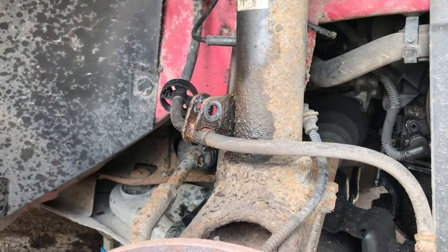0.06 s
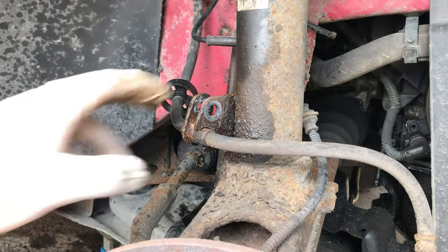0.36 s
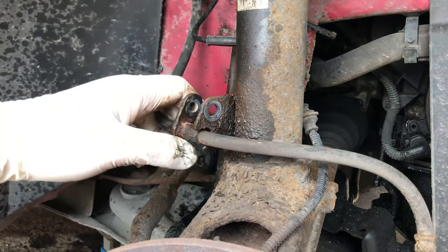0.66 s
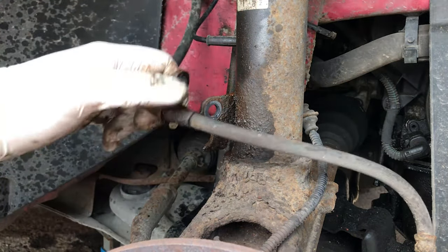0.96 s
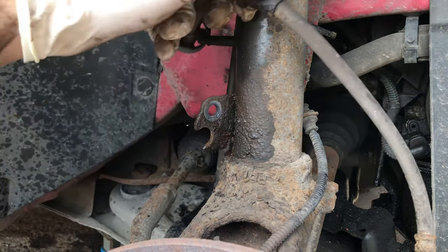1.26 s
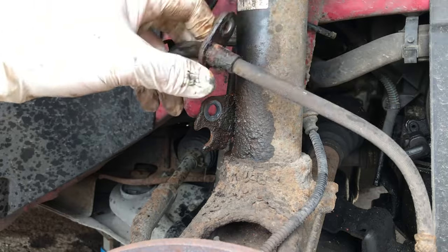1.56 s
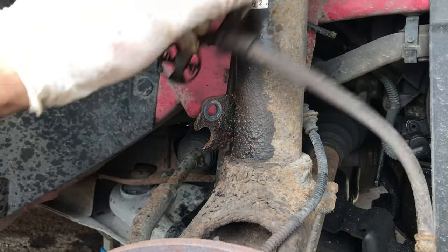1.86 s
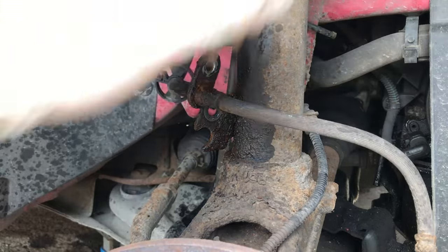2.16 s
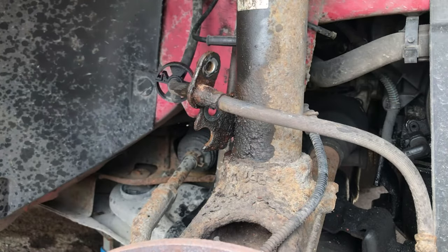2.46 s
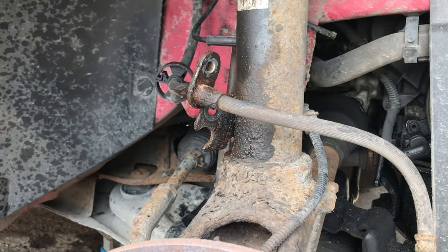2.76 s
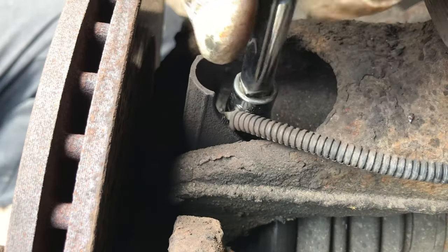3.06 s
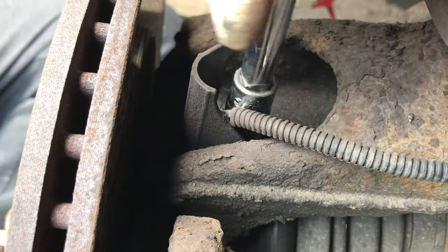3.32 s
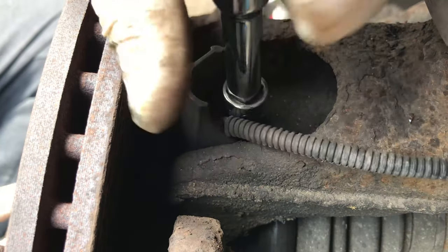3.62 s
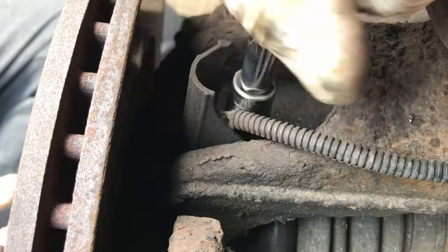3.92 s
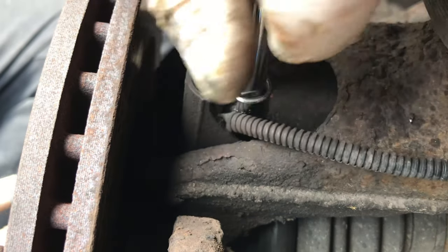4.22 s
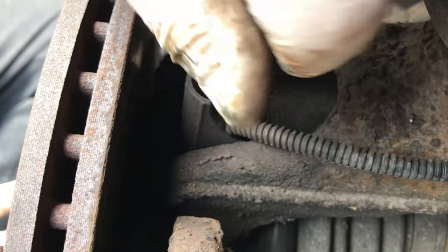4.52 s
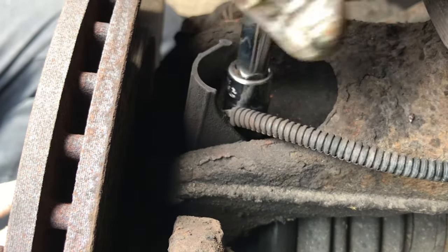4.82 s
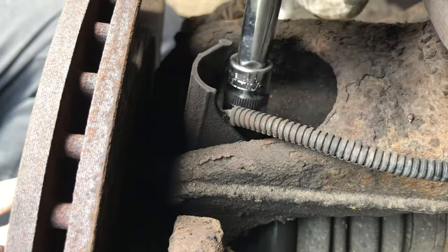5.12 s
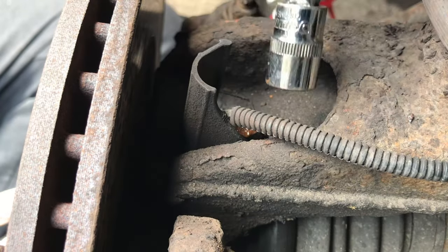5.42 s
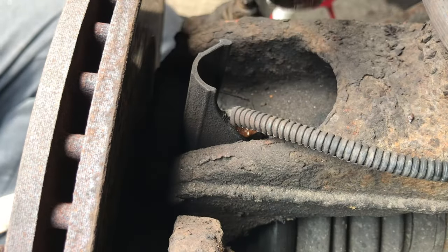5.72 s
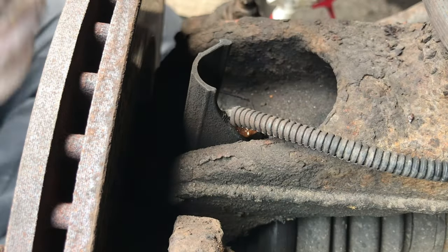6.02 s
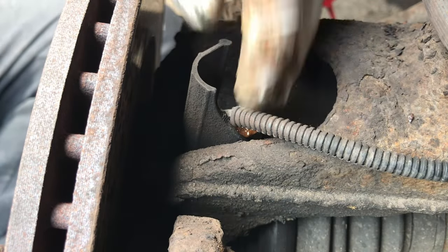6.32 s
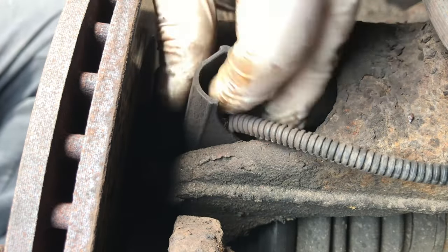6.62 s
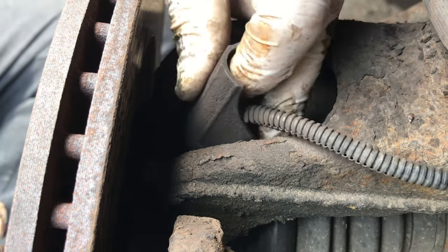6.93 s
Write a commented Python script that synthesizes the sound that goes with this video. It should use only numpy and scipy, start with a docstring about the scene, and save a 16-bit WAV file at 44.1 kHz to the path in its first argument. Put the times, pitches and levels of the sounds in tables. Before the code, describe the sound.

A few metal knocks, then five quick runs of ratchet clicks, a rattling loose socket and light plastic ticks over soft glove rubbing.

```python
"""Gloves rustle inside a car's wheel arch, close to the microphone, and keep on throughout.
A rusty brake-hose bracket scrapes free and knocks against the strut; then a socket ratchet is swung
back five times, its pawl snapping over the teeth and ringing the tool. The loose socket rattles on
the bolt and is lifted off, and fingers pick at a ribbed cable sleeve. Behind it all, a quiet garage hums."""
import sys
import numpy as np
from scipy import signal
from scipy.fft import rfft, irfft
from scipy.io import wavfile
from scipy.ndimage import uniform_filter1d

SR = 44100
rng = np.random.default_rng(int(sys.argv[2]) if len(sys.argv) > 2 else 0)


def wrap_up_sound(samples):
    """Save the sound to the file named by the first command line argument, as 16-bit audio."""
    columns = np.atleast_2d(samples).T
    # keep every value between -1 and 1, then stretch to whole-number steps
    tamed = np.clip(columns, -1, 1)
    steps = np.round(tamed * 32767).astype(np.int16)
    wavfile.write(sys.argv[1], SR, steps)


N = 307818
TIME = np.arange(N) / SR
AGE = TIME[:12288]  # seconds since a hit
TOP_HZ = 16000


# Back-swings of the handle. Each row: first and last click in seconds, teeth, level in dB,
# slow start as a share of the length, handle ring in dB, t60 of the snap in seconds.
SWINGS = [(3.116, 3.1856, 4, -23.5, .096, 2, 0.033), (3.7084, 3.7704, 5, -19, .1, 0, 0.033),
          (4.1385, 4.237, 8, -18, -0.041, -1.5, .033), (4.527, 4.6116, 8, -18.5, -.061, -2.5, 0.02),
          (4.8888, 4.975, 8, -18.5, -0.022, -2.5, 0.027)]
# Single teeth as the hand starts or stops. Each row: start in seconds, level in dB,
# handle ring in dB, t60 of the snap in seconds.
SINGLE_TEETH = [(3.0334, -22, -10, 0.0091), (3.083, -27, -11, 0.0053), (3.226, -20.5, -14, 0.024),
                (3.668, -16, -2, 0.054), (3.6841, -24, -3, 0.014), (3.7938, -19.5, -13, 0.031)]

def pawl_drops(tire_db=3.5, skim_db=2, ring_scatter_db=2.8):
    """Each drop's time, level, handle ring, head ring and t60; the pawl falls less far in mid-swing."""
    for start, end, count, db, slow_start, ring_db, t60 in SWINGS:
        times = tooth_times(start, end, count, slow_start)
        turned = np.linspace(0, 1, len(times))
        middle = np.sin(np.pi * turned)
        force, grip, seat = rng.standard_normal((len(times), 3)).T
        levels = db - tire_db * turned - skim_db * middle + force
        handle_db = ring_db - 0.79 + 5 * middle - 6.4 * turned + ring_scatter_db * grip
        head_db = -12 + 1.4 * middle - 2.8 * turned + ring_scatter_db * seat
        yield from zip(times, levels, handle_db, head_db, np.full(len(times), t60))
    for s, db, ring_db, t60 in SINGLE_TEETH:
        yield s, db, ring_db, -22, t60


def tooth_times(start, end, count, slow_start, easing=0.026):
    """A swing eases in and out, so its clicks crowd in the middle."""
    turned = np.linspace(0, 1, round(count))
    eased = turned + slow_start * np.sin(np.pi * turned) + easing * np.sin(2 * np.pi * turned)
    return start + (end - start) * eased


# Short resonances of the whole tool. Each row: frequency in Hz, width in Hz, gain in dB.
TOOL_RESONANCES = [(654, 68, -10), (1150, 180, -10), (1695, 113, -3.5), (1890, 130, -5), (2340, 77, 1),
                   (3040, 200, -4), (3170, 310, -2), (3930, 460, 4), (4410, 200, 7), (4680, 220, 1.5),
                   (5350, 260, 0.5), (6220, 630, 1), (6500, 160, 6), (6800, 300, 4), (7600, 190, 5.5),
                   (8200, 150, 5.5), (9220, 200, 2.5), (9900, 340, -0.5), (10000, 200, -0.5),
                   (11130, 730, -5), (11900, 320, 5), (13155, 370, 6.5), (12930, 520, 3), (13600, 410, 4.5),
                   (15450, 350, -5.5)]
# Longer modes of its handle and head. Each row: frequency in Hz, gain in dB, t60 in seconds.
HANDLE_MODES = [(4160, -8.5, 0.041), (4085, 3, 0.053), (4620, -15.5, 0.053)]
HEAD_MODES = [(7200, -7, .05), (8090, 10, 0.039), (9000, -9, 0.061), (12000, -2, .05), (14300, -8.5, 0.043)]
# Steel cracking on steel, heard close up. Each row: frequency in Hz, gain in dB.
CRACK_SPECTRUM = [(200, -38), (1400, -16), (3500, 0.5), (7000, -0.5), (10500, 4.5), (13000, 1), (16000, 1)]

def ratchet(snap_db=-1, crack_db=-5, bounce_db=-8, slide_db=-19, tail_db=-30):
    """Close to the microphone, the pawl slides up a tooth, drops and bounces, ringing the tool."""
    out = np.zeros(N)
    treble = np.clip(np.log2(bins(len(AGE)) / 7000), 0, 1)
    build_up = 1 - fade(0.011)  # the tool takes up the blow over a few round trips
    for s, db, handle_db, head_db, t60 in pawl_drops():
        contact = fade(0.019)
        bounce = undb(bounce_db) * np.roll(contact, int(rng.uniform(0.00041, 0.0038) * SR))
        crack = unit_attack(colour(hiss(), CRACK_SPECTRUM) * (contact + bounce))
        decay = fade(t60) + undb(tail_db) * fade(0.2)
        chatter = unit_attack(resonate(hiss() * decay, TOOL_RESONANCES))
        snap = undb(snap_db) * chatter + undb(crack_db) * crack
        add(out, s, undb(db) * shade(snap, treble * rng.normal(-0.9, 2.2)))
        handle = undb(handle_db) * ring(HANDLE_MODES, detune=0.0034)
        head = undb(head_db) * ring(HEAD_MODES, detune=0.002)
        add(out, s, undb(db) * build_up * (handle + head))
        slide = colour(hiss(), CRACK_SPECTRUM) * fade(0.009)[::-1]  # swells up to the drop
        add(out, s - AGE[-1], undb(db + slide_db) * slide)
    return out


def pawl_catches(share=0.55, longest_lead_s=0.006, catch_db=-12):
    """The pawl often ticks on the tip of a tooth just before it drops."""
    out = np.zeros(N)
    for start, end, count, db, slow_start, _, _ in SWINGS:
        for s in tooth_times(start, end, count, slow_start)[1:]:
            lead = longest_lead_s * rng.uniform(0.3, 1)
            caught = rng.random() < share
            tick = unit_attack(resonate(hiss() * fade(0.012), TOOL_RESONANCES))
            add(out, s - lead, caught * undb(db + catch_db) * tick)
    return out


# Socket and extension tap the steel. Each row: start in seconds, then level, body and brightness in dB.
SOCKET_TAPS = [(1.263, -44.5, -19, 3.5), (1.3135, -52.5, -17, 15), (3.0775, -41.5, -25, 6),
               (3.41, -41, -4, -5), (3.621, -37, -19, -2), (3.6601, -34.5, -13, -7.5),
               (3.8255, -32, -15, -16), (3.8812, -39.5, -13.5, -3.5), (4.0981, -31, -9, -5),
               (4.1368, -30, -22, -11), (4.3041, -34.5, -11, -2), (4.3118, -34.5, -13, -10),
               (4.4716, -53, 5, -21.5), (4.6762, -32.5, -9, -3), (4.7094, -40.5, -12.5, -12),
               (4.7635, -44, 2, -13), (4.8339, -33, -9, -18.5), (5.0174, -32, -12.5, -12),
               (5.0356, -43, 5.5, 10), (5.0929, -33, -1.5, 0.5), (5.1552, -39, -2.5, -3),
               (5.2615, -42, -7, 2), (5.2728, -43.5, -14.5, 4)]
# The socket scrapes on the bolt head. Each row: start and end in seconds, level in dB.
SOCKET_SCRAPES = [(3.596, 3.619, -43), (4.078, 4.099, -50.5), (4.499, 4.527, -44.5), (4.653, 4.696, -44),
                  (4.815, 4.838, -48), (5.003, 5.045, -47), (5.09, 5.098, -38.5), (5.159, 5.185, -52),
                  (5.216, 5.283, -47.5)]
# Socket and hub when tapped, and the hollow bore when scraped.
# Each row: frequency in Hz, width in Hz, gain in dB.
SOCKET_RESONANCES = [(646, 37, 0), (960, 62, -1.5), (1726, 131, 4), (1890, 150, 1.5), (2390, 330, -1.5),
                     (3060, 110, 3.5), (3510, 84, 7), (3960, 120, 7), (4530, 130, 4), (5680, 820, -3.5),
                     (6850, 610, 2), (7700, 520, 0.5), (8840, 1500, -2), (12100, 460, -3.5),
                     (13530, 1300, -9.5)]
BORE_RESONANCES = [(655, 85, -10.5), (1700, 240, 7.5), (1790, 110, -4), (2930, 200, -8), (3680, 260, -3),
                   (7000, 900, -18.5)]

def socket(rattles_per_s=60):
    """At the hub, the loose socket rattles and scrapes between swings and as it is lifted off."""
    slips = resonate(grains(per_s=4500, spread_db=4.5), BORE_RESONANCES)
    touches = list(SOCKET_TAPS)
    for start, end, db in SOCKET_SCRAPES:  # light, dull taps at uneven moments of each scrape
        count = max(round((end - start) * rattles_per_s), 1)
        times = start + (end - start) * (np.arange(count) + rng.random(count)) / count
        touches += [(s, db + rng.normal(1, 1.5), -7.5, -13.5) for s in times]
    ticks = taps(touches, SOCKET_RESONANCES, gain_db=3.5, crack_db=-9.5, contact_t60=0.013,
                 body_db=8, bright_db=1, tail_db=-21.5, tail_t60=0.061)
    return ticks + swells(slips, SOCKET_SCRAPES, taper=0.37)


# Blows on the strut. Each row: start in seconds, level in dB, centre of the clank in Hz,
# its width in octaves, body thump in dB.
STRUT_BLOWS = [(1.268, -23.5, 2780, 0.56, -25), (1.295, -44, 2120, 2.4, -4), (1.366, -53, 1390, 1.1, -20),
               (1.6982, -26.5, 2260, 0.75, -22), (1.9312, -26, 1090, 3.7, -5),
               (1.934, -31.5, 3880, 0.12, -11.5), (2.297, -41.5, 5360, 0.65, -1.5),
               (2.7325, -34, 1850, 0.7, -13), (2.756, -47, 1500, 0.98, -35), (3.799, -35.5, 900, 6.8, 3),
               (5.47, -60, 4500, 1.03, -21.5), (5.824, -53.5, 2000, 1.8, -18)]
# Modes of strut and hose, and the low ones of suspension and wing.
# Each row: frequency in Hz, gain in dB, t60 in seconds.
STRUT_MODES = [(476, -11.5, 0.23), (690, -2.5, 0.12), (950, -5, 0.1), (1140, 0.5, 0.093), (1400, -5, 0.059),
               (1760, -7.5, 0.1), (1920, 2, 0.035), (2100, -18, 0.022), (2290, -7.5, 0.11),
               (2720, -4.5, 0.066), (3237, 8.5, 0.025), (3310, -8, .05), (3430, 0, 0.058),
               (3680, -28, 0.063), (4230, 8.5, 0.023)]
BODY_MODES = [(56, -25, .5), (103.6, -11, 0.51), (181, -9, 0.14), (257.5, -6.5, 0.2), (375, -0.5, 0.049)]
# The strut's clank. Each row: frequency in Hz, gain in dB.
CLANK_SPECTRUM = [(60, -14), (430, 11), (800, -2.5), (960, 9), (1160, 7), (1350, -2.5), (1750, -4.5),
                  (2300, 1.5), (2900, -5.5), (4200, -3.5), (5000, -6), (7500, -6.5), (10000, -10),
                  (16000, -10.5)]

def strut_knocks(clank_db=1, ring_db=-7, skirt_db=22):
    """The place of contact picks which strut modes sound; heavy blows also shake the car's body."""
    out = np.zeros(N)
    for s, db, centre, octaves, thump_db in STRUT_BLOWS:
        def band_db(hz):
            return -skirt_db * np.log10(1 + (np.log2(hz / centre) / octaves) ** 2)
        clank = colour(hiss(), CLANK_SPECTRUM, band_db(bins(len(AGE)))) * fade(0.054)
        metal = ring([(hz, gain + band_db(hz), t60) for hz, gain, t60 in STRUT_MODES], detune=0.0013)
        body = ring(BODY_MODES, detune=0.04) * (1 - fade(0.043))
        onset = 1 - fade(0.0025)  # rust and rubber soften the contact
        knock = undb(clank_db) * clank + undb(ring_db) * metal + undb(thump_db) * body
        add(out, s, undb(db) * onset * knock)
    return out


# The bracket drags on its seat. Each row: start, swell and hold in seconds, force in dB.
BRACKET_DRAGS = [(.6, 0.054, 0.0055, -38), (0.7966, 0.00043, 0.012, -27.5)]
# Its modes. Each row: frequency in Hz, gain in dB, t60 in seconds.
BRACKET_MODES = [(686, -15, 0.055), (1086, -12.5, 0.079), (1686, -5, 0.064), (1798, 2, 0.069),
                 (1853, 3, 0.045), (3510, -23, 0.025), (3780, -1.5, 0.027), (4130, -3.5, 0.034),
                 (5770, -1, 0.0054), (6400, -11, 0.014), (6800, -5.5, 0.033), (7760, -15, 0.0097),
                 (9600, -9, 0.019)]
# Rust grinding under it. Each row: frequency in Hz, gain in dB.
RUST_SPECTRUM = [(200, -14), (650, -14.5), (1050, -6), (1400, -9), (1800, -10), (2500, -21), (3800, 5),
                 (4900, -25), (7500, -10.5), (10000, -17.5), (12000, -22), (16000, -30)]

def bracket(ring_db=-2, rust_db=-4, jolt_db=5, swell_db=13, release_db_per_s=707):
    """Rusty steel sticks, slips and rings; each drag jolts loose, builds, holds and lets go."""
    slips = grains(per_s=11000, spread_db=0.5)
    force = np.zeros(N)
    for start, swell, hold, db in BRACKET_DRAGS:
        age = np.maximum(TIME - start, 0)
        jolt = jolt_db * np.exp(-age / 0.002)
        building = swell_db * np.clip(1 - age / swell, 0, 1)
        release = release_db_per_s * np.maximum(age - swell - hold, 0)
        force += (age > 0) * undb(db + jolt - building - release)
    rings = excite(slips * force, ring(BRACKET_MODES, detune=0.0022))
    return undb(ring_db) * rings + undb(rust_db) * force * colour(slips, RUST_SPECTRUM)


# Fingertips flick the sleeve. Each row: start in seconds, then level, body and brightness in dB.
SLEEVE_FLICKS = [(6.1635, -47, -18, 15), (6.1812, -40, -15, -24.5), (6.3385, -56, 10, -2.5),
                 (6.3634, -57.5, -8, 26.5), (6.3719, -33.5, -4, -29), (6.412, -42, -2.5, -11),
                 (6.5082, -28.5, -12.5, -23), (6.5461, -41, -10, 3.5), (6.5835, -41, -1.5, 7),
                 (6.6122, -47.5, 4.5, -12), (6.7605, -49, -23, 6.5), (6.8972, -44, -3.5, 2.5),
                 (6.9761, -33.5, -11, 0.5)]
# Fingers squeeze it. Each row: start and end in seconds, level in dB.
SLEEVE_SQUEEZES = [(6.29, 6.36, -65), (6.446, 6.47, -51), (6.487, 6.72, -62), (6.7, 6.983, -55.5)]
# The sleeve and its recess in the arch. Each row: frequency in Hz, width in Hz, gain in dB.
SLEEVE_RESONANCES = [(854, 76, -0.5), (1030, 170, -1.5), (1247, 57, 3.5), (1616, 95, 10), (2554, 127, 9.5),
                     (3420, 670, -2.5), (4120, 82, 7), (4530, 120, 5), (5570, 340, 6), (6530, 220, 5),
                     (7300, 310, 6), (9300, 1000, 2.5), (11300, 540, 2), (12900, 2500, -3)]

def sleeve():
    """The cable sleeve's plastic ribs tick when flicked and crackle when squeezed."""
    flicks = taps(SLEEVE_FLICKS, SLEEVE_RESONANCES, gain_db=3.5, crack_db=-9, contact_t60=0.0064,
                  body_db=6, bright_db=-5, tail_db=-7.5, tail_t60=0.039)
    slips = grains(per_s=1400, spread_db=4.5) * undb(10 * wander(45))
    return flicks + swells(resonate(slips, SLEEVE_RESONANCES), SLEEVE_SQUEEZES, taper=0.32)


# Fingers rub on tool and parts. Each row: time in seconds, level in dB.
RUB_LEVELS = [(0.0, -68.5), (0.27, -68.5), (0.68, -64), (0.95, -70), (1.69, -65.5), (1.82, -54.5),
              (2.1, -72.5), (2.62, -66.5), (2.84, -61), (3.03, -63.5), (3.15, -54), (3.58, -62),
              (3.77, -49), (3.95, -57), (4.9, -57.5), (5.12, -50.5), (5.27, -65), (5.5, -72.5), (6.12, -65),
              (6.36, -60), (6.98, -68.5)]
# Gloves brush past, near the microphone.
# Each row: start and end in seconds, level in dB, tilt in dB per octave.
GLOVE_BRUSHES = [(0.041, 0.113, -54, 3.5), (0.436, 0.527, -48.5, 7), (0.589, 0.692, -51.5, -1),
                 (1.352, 1.508, -51.5, 6), (1.606, 1.68, -56.5, 6.5), (1.845, 1.915, -41.5, 2.5),
                 (2.29, 2.374, -45, 3.5), (2.96, 3.01, -51, 5.5), (3.516, 3.67, -55.5, -0.5),
                 (3.979, 4.049, -47.5, 6.5), (4.293, 4.335, -46.5, -3.5), (6.03, 6.212, -49, 2),
                 (6.278, 6.361, -45, 0), (6.457, 6.68, -49.5, 3)]
# The colours of rubbing and of brushing. Each row: frequency in Hz, gain in dB.
FINGER_SPECTRUM = [(120, -45.5), (200, -1.5), (416, -4), (491, -14), (899, -2.5), (1420, -13), (1710, -8),
                   (2130, -13), (3490, -9.5), (12600, -17.5), (16000, -17)]
GLOVE_SPECTRUM = [(180, -44), (300, -23.5), (584, -3), (978, 5.5), (1360, -1), (3130, 0), (5080, -1.5),
                  (6200, 1), (10200, -4), (16000, -4)]

def gloves(rub_db=-1.5, flutter_db=2, treble_flutter_db=5.5, fold_db=2):
    """Rubber and cloth slip finely: steady rubbing whose colour shifts, and brushes that swell and fade."""
    rub = colour(grains(per_s=11000, spread_db=3.5), FINGER_SPECTRUM)
    dull = signal.sosfilt(signal.butter(1, 5000, fs=SR, output="sos"), rub)
    lows = dull * undb(flutter_db * wander(24))
    highs = (rub - dull) * undb(treble_flutter_db * wander(12))
    out = undb(rub_db) * curve(RUB_LEVELS) * (lows + highs)
    crackle = grains(per_s=5000, spread_db=1.6) * undb(flutter_db * wander(70))
    fold_log_hz = np.linspace(np.log(500), np.log(TOP_HZ), 40)
    for start, end, db, tilt in GLOVE_BRUSHES:
        brush = crackle[int(start * SR):int(end * SR)]
        hz = bins(len(brush))
        folds = np.interp(np.log(hz), fold_log_hz, rng.standard_normal(40))  # each fold has its own colour
        octaves = np.log2(np.clip(hz / 4000, 1 / 4, 4))
        brush = colour(brush, GLOVE_SPECTRUM, tilt * octaves + fold_db * folds)
        add(out, start, undb(db) * brush * signal.windows.tukey(len(brush), 0.7))
    return out


def grit(grit_db=-11):
    """Specks of rust and dirt tick under the rubbing fingers."""
    return undb(grit_db) * curve(RUB_LEVELS) * colour(grains(per_s=180, spread_db=2.5), GLOVE_SPECTRUM)


# The car rumbles as it is handled. Each row: time in seconds, level in dB.
RUMBLE_LEVELS = [(0.0, -59.5), (1.22, -65.5), (1.3, -55.5), (1.48, -65.5), (1.9, -56), (1.98, -46.5),
                 (2.04, -57), (2.27, -60.5), (2.33, -57), (2.59, -63.5), (4.18, -56), (4.24, -63.5),
                 (4.35, -55), (4.55, -53), (4.61, -68), (4.7, -51.5), (4.99, -60), (5.07, -50), (5.33, -62),
                 (6.98, -64)]
# That rumble, the garage's air and its hum. Each row: frequency in Hz, level in dB.
RUMBLE_SPECTRUM = [(22, -22.5), (33, -4.5), (48, 9), (80, 2), (108, 3), (171, -4.5), (235, -2.5),
                   (329, -13), (422, -10.5), (650, -33.5), (1100, -85)]
AIR_SPECTRUM = [(59, -23), (100, -2), (124, -20.5), (156, -7.5), (381, -25.5), (502, -21.5), (662, -18),
                (818, -22.5), (1280, -23.5), (3780, -31.5), (16000, -36.5)]
HUM_TONES = [(49.5, -76), (100, -68.5)]
# A faint whistle, far off. Each row: start and end in seconds, first and last pitch in Hz, level in dB.
FAR_WHISTLES = [(2.17, 2.312, 1820, 1790, -69), (2.296, 2.564, 2550, 2070, -69.5),
                (2.866, 2.982, 1840, 2200, -69)]

def garage(rumble_db=0.5, air_db=-67.5):
    """Behind the work: still air, the rumble of the handled car, a low hum and a thin, distant whistle."""
    out = undb(air_db) * colour(rng.standard_normal(N), AIR_SPECTRUM)
    out += undb(rumble_db) * curve(RUMBLE_LEVELS) * colour(rng.standard_normal(N), RUMBLE_SPECTRUM)
    for hz, db in HUM_TONES:
        out += undb(db + 0.86 * wander(3.5)) * np.sqrt(2) * np.sin(2 * np.pi * hz * TIME)
    for start, end, from_hz, to_hz, db in FAR_WHISTLES:
        hz = np.linspace(from_hz, to_hz, int((end - start) * SR))
        add(out, start, undb(db) * np.hanning(len(hz)) * np.sin(2 * np.pi * np.cumsum(hz) / SR))
    return out


def room(x, wet_db=-25, t60=0.23):
    """This close to the work, the workshop's reflections are weak and dull."""
    walls = [(100, -4.5), (1000, 16.5), (3000, 9), (8000, -26), (16000, -32.5)]  # Hz, dB
    tail = colour(hiss(), walls) * fade(t60) * (1 - fade(0.017))
    return x + undb(wet_db) * excite(x, tail)


def taps(rows, resonances, gain_db, crack_db, contact_t60, body_db, bright_db, tail_db, tail_t60):
    """Brief contacts crack and ring a small part; the spot touched shifts the balance of its modes."""
    out, hz = np.zeros(N), bins(len(AGE))
    low = np.clip(np.log2(3500 / hz), 0, 1)
    high = np.clip(np.log2(hz / 5500), 0, 1)
    decay = fade(contact_t60) + undb(tail_db) * fade(tail_t60)
    for s, db, body, bright in rows:
        touched = [(f, width, rng.normal(gain, 1.6)) for f, width, gain in resonances]
        tick = unit_attack(resonate(hiss() * decay, touched))
        tick += undb(crack_db) * unit_attack(colour(hiss(), CRACK_SPECTRUM) * fade(0.006))
        tone_db = low * (body + body_db) + high * (bright + bright_db)
        add(out, s, undb(db + gain_db) * shade(tick, tone_db))
    return out


def swells(sound, rows, taper):
    """Let a steady sound swell and fade in each (start, end, dB) stretch."""
    out = np.zeros(N)
    for start, end, db in rows:
        part = unit(sound[int(start * SR):int(end * SR)])
        add(out, start, undb(db) * part * signal.windows.tukey(len(part), taper))
    return out


def ring(modes, detune):
    """Decaying modes; the grip shifts their pitch a little from blow to blow."""
    out = np.zeros(len(AGE))
    for hz, db, t60 in modes:
        pitch = hz * rng.normal(1, detune)
        out += undb(db) * fade(t60) * np.sin(2 * np.pi * (pitch * AGE + rng.random()))
    return out


def resonate(x, resonances):
    """Pass a sound through (Hz, width, dB) resonances of alternating sign."""
    f = bins(len(x))
    response = sum((-1) ** k * undb(db) / (1 + 1j * (f ** 2 - hz ** 2) / (f * width))
                   for k, (hz, width, db) in enumerate(resonances))
    return irfft(rfft(x) * response, len(x))


def excite(x, response):
    """Convolve with an impulse response scaled to unit energy."""
    return signal.fftconvolve(x, response / np.sqrt(np.sum(response ** 2)))[:N]


def colour(x, spectrum, extra_db=0):
    """Give a sound a (Hz, dB) spectrum, at rms 1."""
    hz, db = np.transpose(spectrum)
    gain = undb(np.interp(np.log(bins(len(x))), np.log(hz), db) + extra_db)
    return unit(irfft(rfft(x) * gain, len(x)))


def shade(x, db):
    """Tilt the spectrum of a short hit and keep its first half."""
    return irfft(rfft(x) * undb(db), len(x))[:len(x) // 2]


def grains(per_s, spread_db):
    """Random slips of unequal size."""
    size = undb(spread_db * np.minimum(rng.exponential(size=N), 4))
    return unit((rng.random(N) < per_s / SR) * rng.standard_normal(N) * size)


def wander(per_s):
    """Slow random drift at rms 1."""
    step = int(SR / per_s)
    stairs = np.repeat(rng.standard_normal(N // step + 1), step)
    return unit(uniform_filter1d(stairs, step)[:N])


def hiss():
    """White noise as long as one hit."""
    return rng.standard_normal(len(AGE))


def fade(t60):
    """Decay by 60 dB in t60 seconds."""
    return undb(-60 * AGE / t60)


def curve(rows):
    """Gain over time from (s, dB) rows."""
    return undb(np.interp(TIME, *np.transpose(rows)))


def bins(size):
    """Frequencies of a spectrum, kept above zero."""
    return np.maximum(np.arange(size // 2 + 1) * SR / size, 1)


def undb(db):
    """Decibels to gain."""
    return 10 ** (np.asarray(db) / 20)


def unit(x):
    """Scale to rms 1."""
    return x / np.sqrt(np.mean(x ** 2))


def unit_attack(x):
    """Scale a hit to rms 1 over its first 5 ms."""
    return x / np.sqrt(np.mean(x[:int(0.005 * SR)] ** 2))


def add(out, s, x):
    """Mix a sound in at time s."""
    i = max(int(s * SR), 0)
    out[i:i + len(x)] += x[:max(N - i, 0)]


def scene():
    """One microphone at the wheel arch: the work with its reflections, over dry gloves and garage."""
    bed = garage() + gloves()
    work = grit() + strut_knocks() + bracket() + ratchet() + sleeve() + socket() + pawl_catches()
    return (bed + room(work))[None]


def record(dry):
    """The recorder cuts the top treble steeply."""
    return signal.sosfilt(signal.ellip(8, 0.2, 70, TOP_HZ, fs=SR, output="sos"), dry)


dry = scene()
out = record(dry)
wrap_up_sound(out)
```